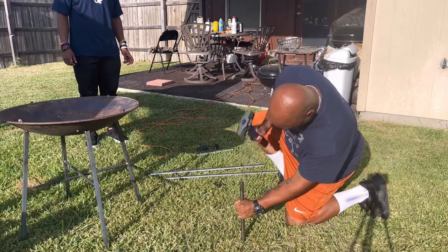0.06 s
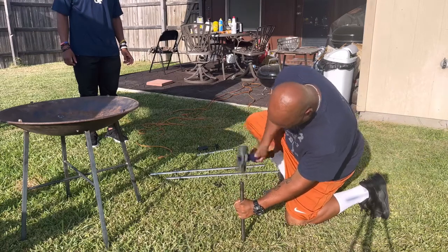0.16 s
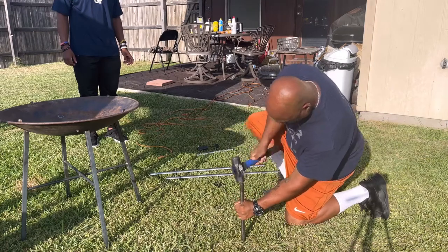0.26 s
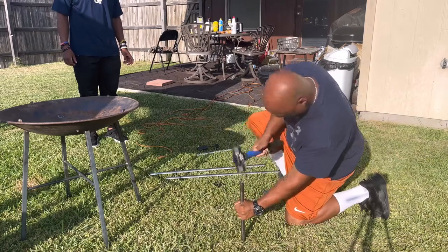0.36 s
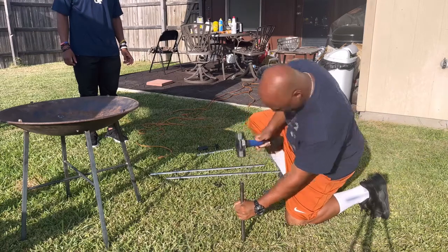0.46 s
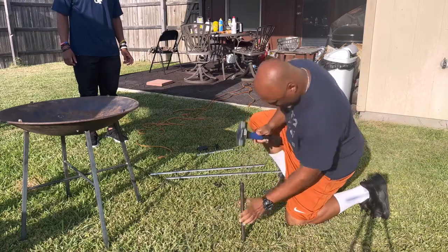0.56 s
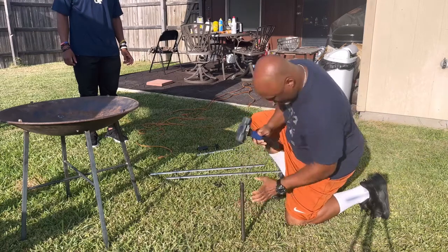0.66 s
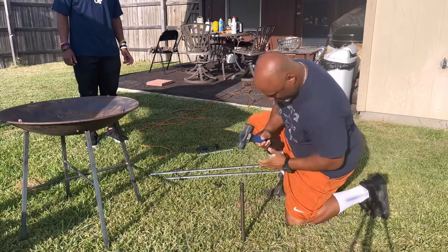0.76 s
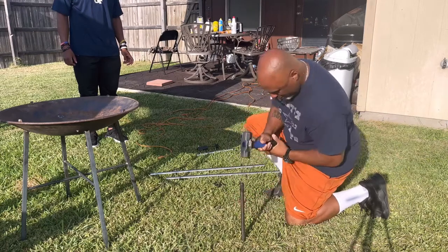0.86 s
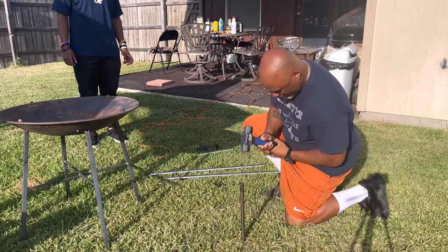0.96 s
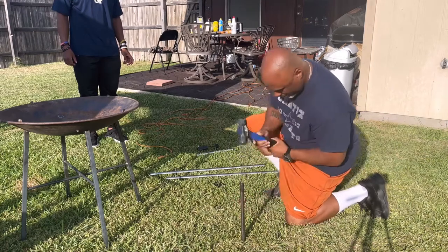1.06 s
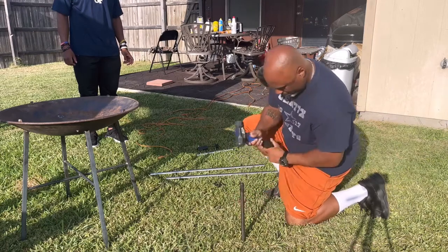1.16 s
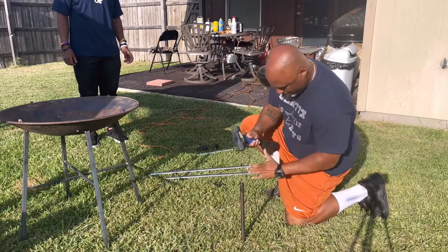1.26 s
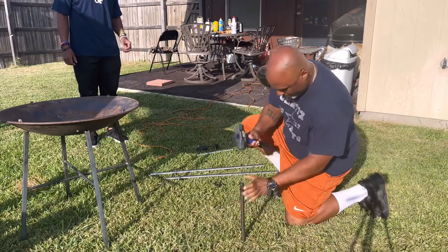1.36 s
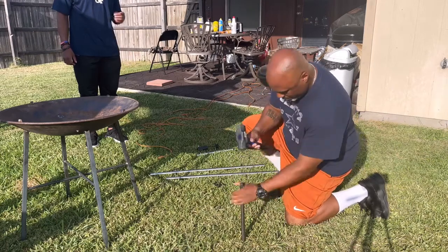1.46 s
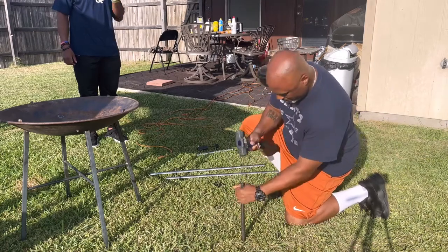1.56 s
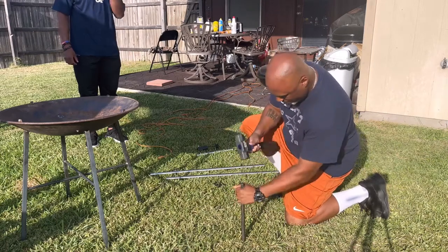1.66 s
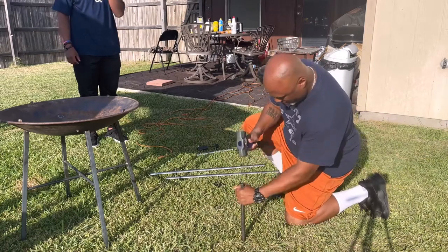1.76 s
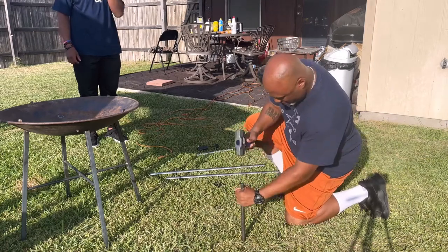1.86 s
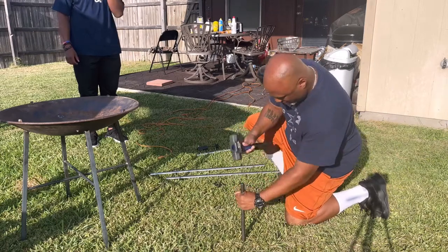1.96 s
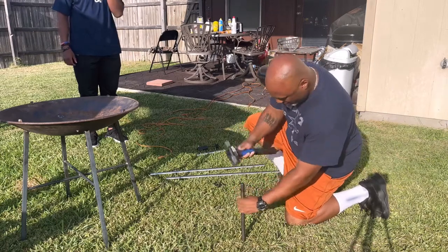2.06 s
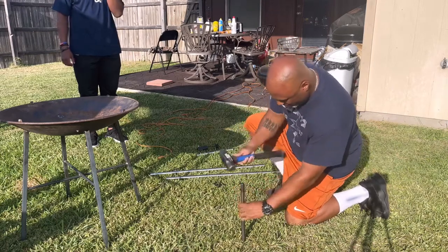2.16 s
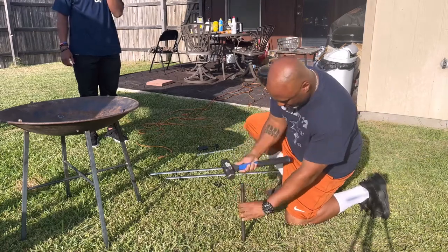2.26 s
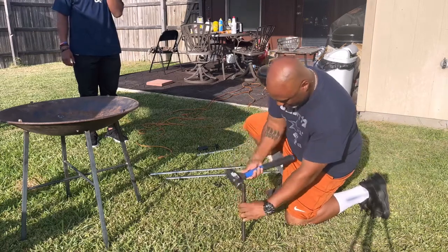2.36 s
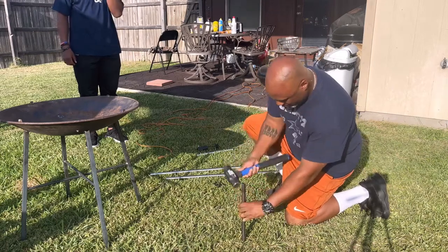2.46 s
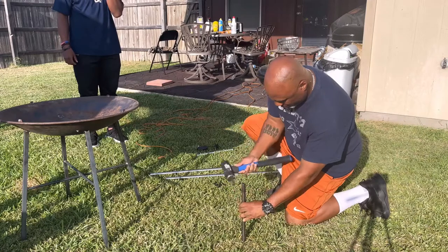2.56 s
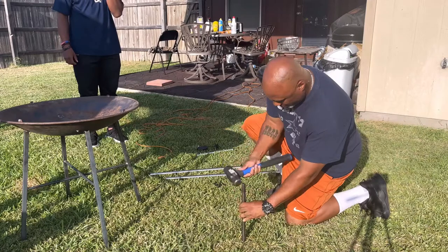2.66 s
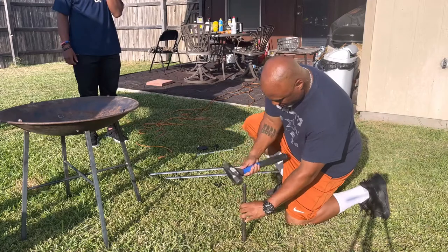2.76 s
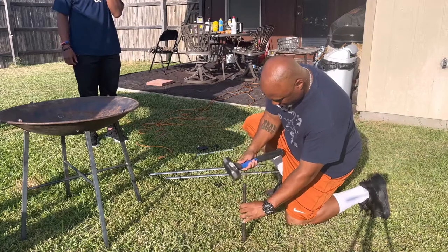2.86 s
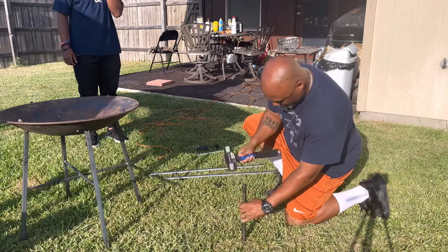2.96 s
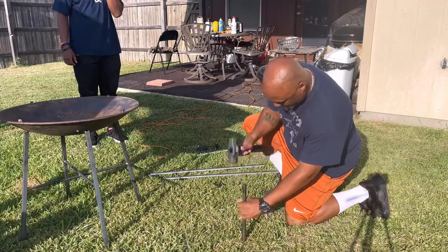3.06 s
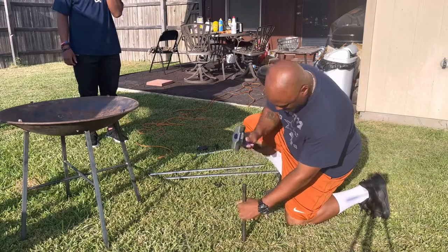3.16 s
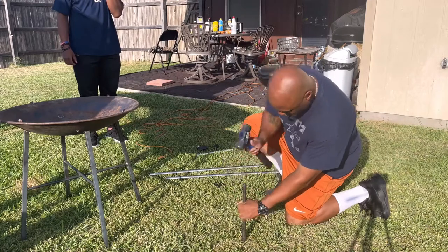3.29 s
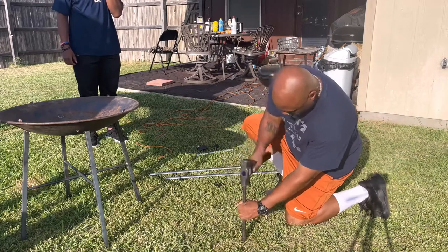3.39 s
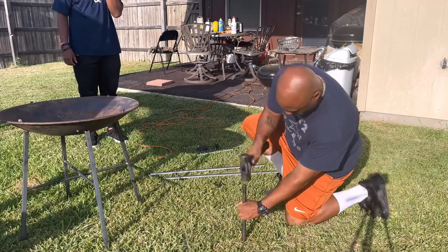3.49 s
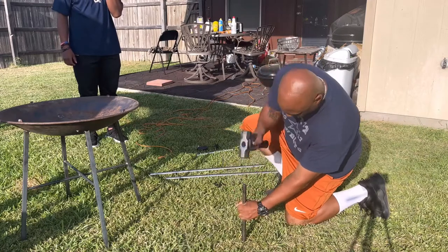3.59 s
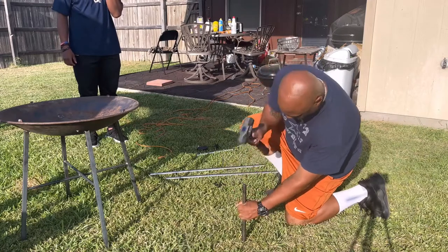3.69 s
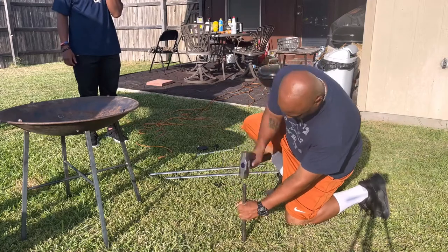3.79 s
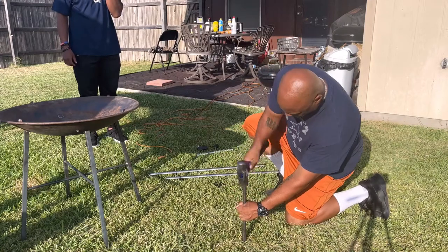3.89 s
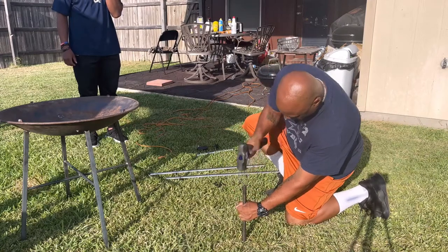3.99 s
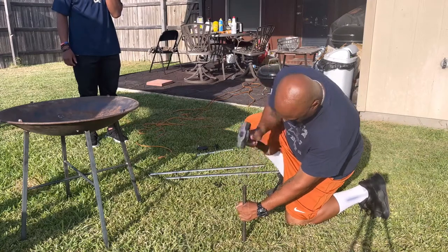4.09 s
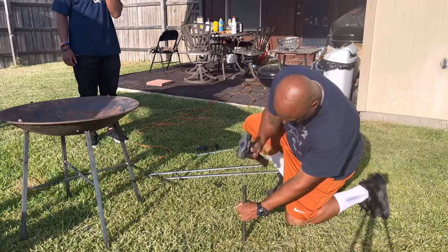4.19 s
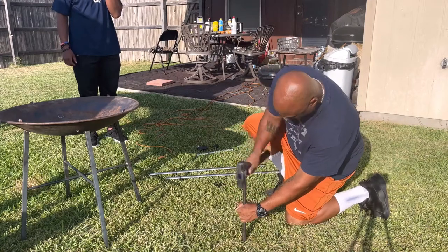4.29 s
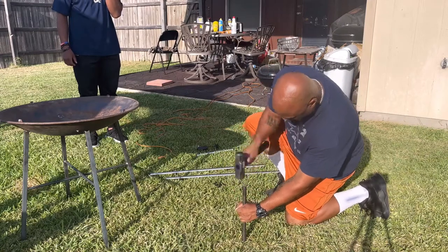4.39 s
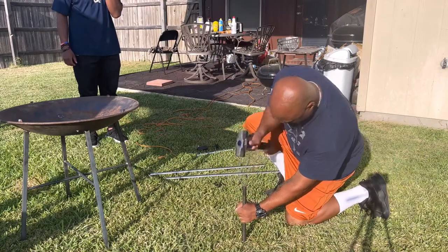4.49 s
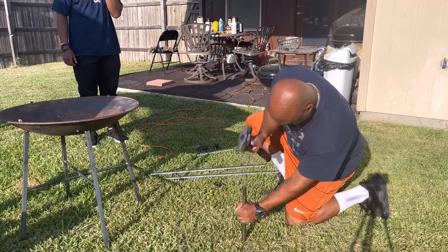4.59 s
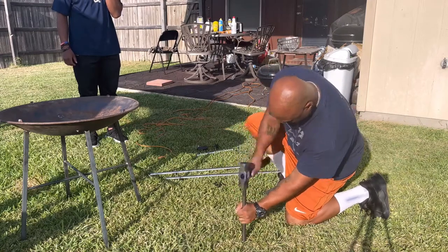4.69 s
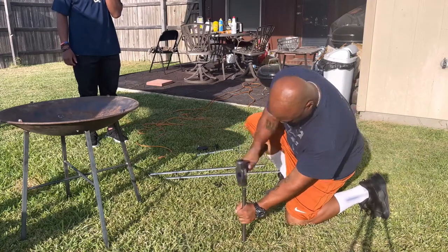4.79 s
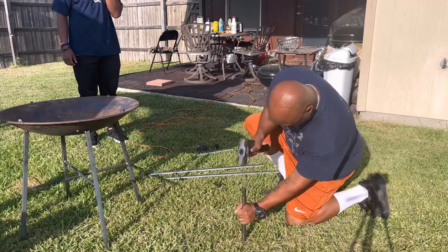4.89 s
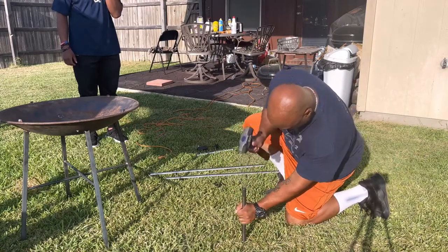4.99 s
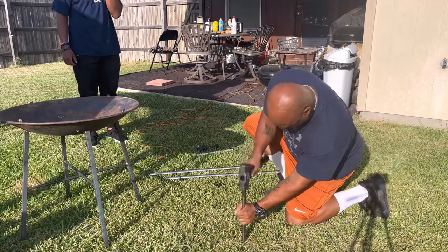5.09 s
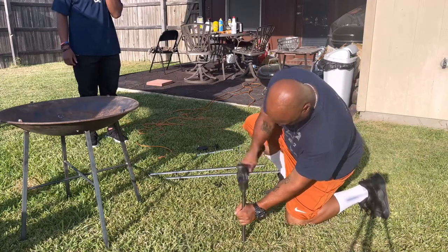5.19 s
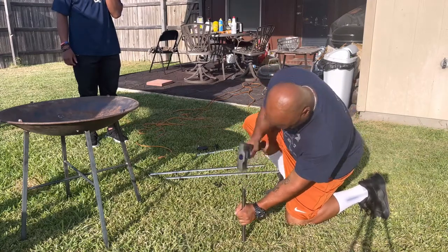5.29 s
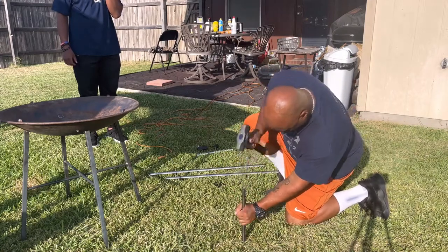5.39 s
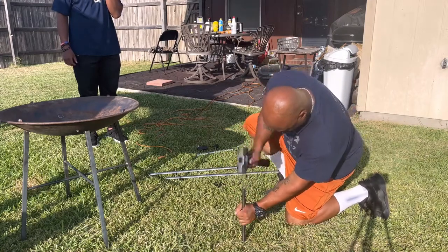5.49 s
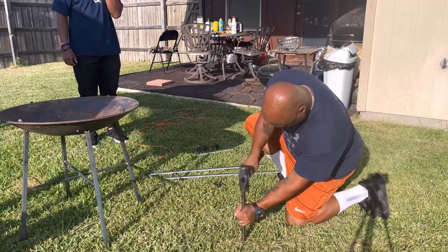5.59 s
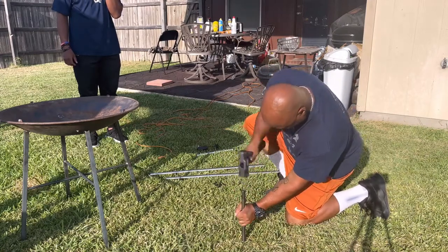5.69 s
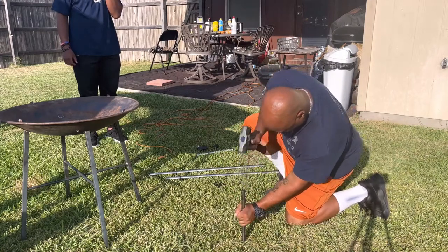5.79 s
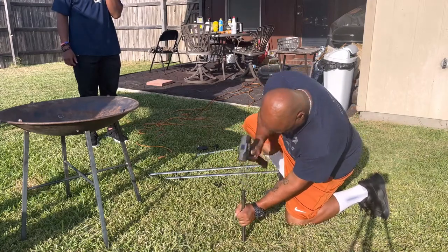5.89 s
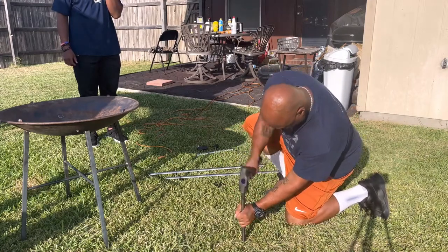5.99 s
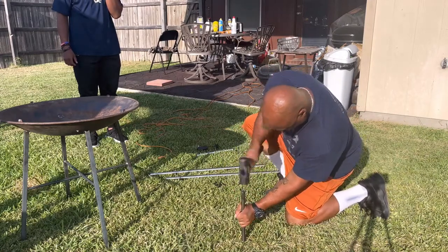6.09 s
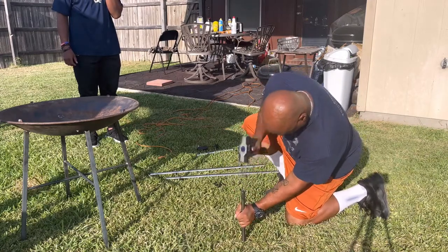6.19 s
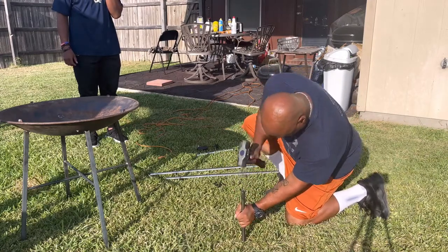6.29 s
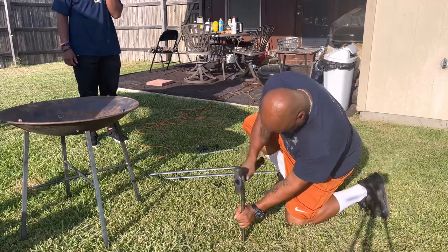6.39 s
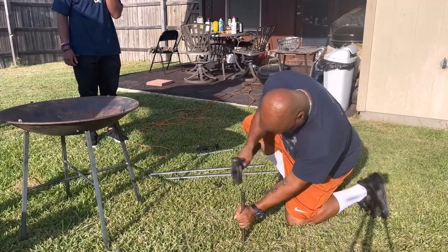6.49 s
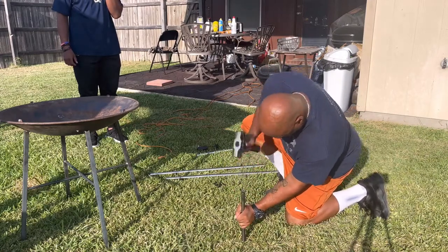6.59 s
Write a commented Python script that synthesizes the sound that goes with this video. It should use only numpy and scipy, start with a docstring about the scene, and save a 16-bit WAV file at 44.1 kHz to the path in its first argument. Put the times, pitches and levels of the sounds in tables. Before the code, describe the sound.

Short, damped metal clanks of a hammer on a ground stake, two light taps leading into eight full blows, over faint wind.

```python
"""A clank dies away and another lands: a steel stake, steadied in one fist, is being hammered into a lawn.
After a pause come two light setting taps, then eight full blows. Each is a short, damped clank of steel
with a thin ring, over a thud of soil; house walls and a fence throw it back. Behind it lie light wind on
the microphone, distant traffic and a faint hiss. Early on a far motor swells and fades, and soft bumps,
snapping grass, a far bird and a rustle of clothes dot the gaps."""
import sys
import numpy as np
from scipy import signal
from scipy.fft import rfft, irfft, next_fast_len
from scipy.io import wavfile
from scipy.ndimage import uniform_filter1d

SR = 44100
rng = np.random.default_rng(int(sys.argv[2]) if len(sys.argv) > 2 else 0)


def wav_record(signal):
    """Record a signal, one row per channel, as 16-bit PCM in the file named by sys.argv[1]."""
    frames = np.transpose(np.atleast_2d(signal))
    bounded = np.clip(frames, -1, 1)
    # unit amplitude maps onto the largest positive 16-bit level
    quanta = np.round(bounded * 32767).astype(np.int16)
    wavfile.write(sys.argv[1], SR, quanta)


N = 293265

# Hammer blows; where the head lands decides how much the shaft sings at 4.7 kHz (mid) and 9.6 kHz (top):
# start_s, force_db, mid_ring_db, top_ring_db
HAMMER_BLOWS = [ (-0.235, -7.5, 9, -7), (0.1952, -3.5, 0, -16.5), (2.3363, -16, -5, -3),
                (2.6894, -14, 1.5, -1), (3.3887, -1.5, 0.5, -23), (3.8247, -0.5, 2.5, 3),
                (4.2604, -1, 2, 7), (4.6908, 0, 3, -0.5), (5.109, 0.5, 3.5, 9.5), (5.5384, -0.5, 14, -3),
                (5.9614, -1, 5, -20.5), (6.3579, -1, 6.5, -0.5)]
# Damped modes of hammer head and gripped stake: pitch_hz, width_hz, level_db, pan_db (left minus right)
CLANK_MODES = [ (264, 110, 22, -1.5), (479, 61, 22, -2.5), (745, 160, 17.5, -4), (1015, 120, 23.5, -4.5),
               (1200, 190, 19.5, -3), (1586, 470, 17, -4.5), (2096, 190, 24, 1.5), (2430, 213, 19, -7.5),
               (2695, 250, 20.5, -1), (3121, 180, 25, 0.5), (3391, 280, 20, -1), (5300, 510, 10.5, -11.5),
               (6560, 150, 15, -12.5), (7100, 240, 8, -6.5), (7530, 500, -0.5, -4), (8470, 380, 11, -7),
               (10080, 400, 8, -2), (10830, 160, 17.5, 2.5), (12900, 400, -3, 2.5), (15400, 620, 8, -1.5)]
# Stake modes the fist hardly damps: pitch_hz, width_hz, level_db, pan_db, level_db_per_force_db
RING_MODES = [(4050, 170, -1.5, -5.5, -1.0), (4690, 180, 9, -4, 0.5), (5426, 90, 21.5, -8, 1.2),
              (9557, 80, 18.5, 0.5, -0.05)]
# Tone of steel cracking on steel: frequency_hz, gain_db
CRACK_EQ = [(120, -9), (600, -1), (1500, 0.5), (3300, 2.5), (4500, 0), (6000, -13.5), (7400, 3),
            (10900, 1.5), (12000, -10.5), (16000, -12)]
# Low modes of the soil giving way: pitch_hz, level_db, t60_s, delay_s
SOIL_MODES = [(188, -28, 0.068, .005), (141.6, -27, 0.098, .008), (88, -32.5, .11, 0.01)]
# Phase by which the left microphone port leads the right: frequency_hz, lead_rad
PORT_LEAD = [(150, -.12), (900, -.25), (1800, -.85), (3200, -1.6), (4700, .5), (6600, 0), (10000, 1.2),
             (13000, 1.9)]
# Slapback from walls, patio and fence: delay_s, level_db, smear_s
WALL_SLAPS = [(0.015, -9, 0.0009), (.0185, 0.5, .004), (.0425, -7.5, .005), (.049, -12, .005),
              (0.0847, -5.5, .0028), (.096, -16, 0.005), (.135, -14.5, 0.008)]
# Tone of the slaps against the diffuse tail: frequency_hz, gain_db
SLAP_EQ = [(1000, -5), (2500, -3.5), (4000, 2), (6500, 0), (9000, -11), (15000, -10.5)]
# Decay of the yard's diffuse tail: frequency_hz, t60_s
YARD_DECAY = [(150, 0.49), (1000, 0.51), (3000, 0.51), (5300, 0.59), (8000, 0.38), (11000, 0.41),
              (15000, 0.23)]
# Tone of all the reflections: frequency_hz, gain_db
YARD_EQ = [(100, -16.5), (300, -20), (600, -16), (1100, -13), (2200, -14.5), (3200, -16), (4000, -5.5),
           (5500, -7), (6000, -11.5), (8500, -10.5), (11000, -15), (12500, -28.5), (16000, -20)]
# Rightward lean of the reflections: frequency_hz, pan_db (left minus right)
YARD_BALANCE = [(200, -1), (1000, -2.5), (3000, -3.5), (4200, -8.5), (5300, -11.5), (6600, -5), (10000, 0)]
# Rise and fall of the wind on the microphone: time_s, relative_level_db
WIND_GUSTS = [(0.0, -60), (0.13, -54.5), (0.33, -49), (0.65, -55), (0.89, -56.5), (1.3, -48), (1.46, -55.5),
              (1.72, -70.5), (2.18, -71), (2.76, -56), (2.94, -65.5), (3.3, -77.5), (3.58, -60),
              (4.37, -57.5), (6.31, -53.5), (6.65, -57.5)]
# Tone of the wind's rumble: frequency_hz, gain_db
WIND_EQ = [(20, -21.5), (40, -10), (72, -1.5), (110, -12), (170, -19), (300, -26.5), (600, -67)]
# Tone of distant traffic: frequency_hz, gain_db
TRAFFIC_EQ = [(35, -21.5), (60, 0.5), (81, -10.5), (124, -10), (398, -11), (607, -10), (803, -13),
              (1310, -12.5), (2770, -37.5), (4320, -35.5), (5460, -45), (8510, -51), (9790, -41),
              (10800, -60.5), (16000, -69.5)]
# Narrow band of microphone hiss: frequency_hz, gain_db
HISS_EQ = [(8500, -34.5), (9500, -4.5), (10100, 0), (10700, -37.5)]
# How alike left and right are in the noise layers: frequency_hz, likeness (0 wide, 1 nearly mono)
STEREO_LIKENESS = [(60, 0.44), (180, 1), (550, -0.057), (1650, -0.16), (4970, 0.47), (15000, 0.38)]
# First three harmonics of the motor at the top of its swell: level_db
MOTOR_HARMONICS = [-69, -58, -67]
# Soft low bumps: centre_s, level_db, half_width_s
LOW_BUMPS = [(0.41, -37, 0.021), (0.441, -30.5, 0.0051), (1.132, -38.5, 0.018), (1.257, -28.5, 0.004),
             (1.423, -35, 0.012), (2.794, -32, 0.0044), (5.086, -34.5, 0.012)]
# Grass blades snapping: start_s, level_db
GRASS_SNAPS = [(.575, -63), (.69, -59), (1.0, -64)]
# Chirps of a far bird: start_s, start_pitch_hz, level_db
BIRD_CHIRPS = [(0.88, 4700, -65), (1.275, 4300, -76), (1.385, 4870, -67), (1.765, 4500, -68),
               (1.93, 4450, -75.5), (3.241, 4250, -77.5)]
# Clothing brushing as the arm moves: centre_s, level_db
CLOTH_SWISHES = [(1.13, -75.5), (1.91, -81)]
# Tone of the cloth: frequency_hz, gain_db
CLOTH_EQ = [(2000, -12), (6500, 0), (11000, 3), (13000, -10), (15000, -3), (17000, -14)]

# A harder blow stays longer on the stake and sounds fuller and duller.
# Each pair is the value at 0 dB of force and its change per dB of force.
CONTACT_S, CONTACT_DB_PER_DB = .019, .5
BODY_DB, BODY_DB_PER_DB = -1.5, 0.87   # clank below 900 Hz
TREBLE_DB, TREBLE_DB_PER_DB = -4, -0.66   # 4.8 to 7 kHz
WALL_TREBLE_DB, WALL_TREBLE_DB_PER_DB = 0.57, -0.01   # treble thrown sideways to the walls

LOOSE_BODY_DB, PACKING_S = 9, 2.1   # the loose stake sounds hollow until the soil packs round it
REBOUND_S, REBOUND_SPREAD_S, REBOUND_DB = .0042, .0003, -6
FAR_SIDE_S, FAR_DB_PER_DB = 0.11, -0.23   # the far side of the yard stands out more after a light tap


def from_db(db):
    """Decibels to gain."""
    return 10 ** (np.asarray(db) / 20)


def rms_one(x):
    """Scale to unit rms."""
    return x / np.sqrt(np.mean(x ** 2) + 1e-20)


def at_hz(points, hz):
    """Read a table on a log-frequency axis."""
    frequencies, values = np.transpose(points)
    return np.interp(np.log(np.maximum(hz, 1)), np.log(frequencies), values)


def panned(db):
    """Left and right gains for a left-minus-right level difference."""
    return from_db(np.array([[.5], [-.5]]) * db)


def eq(x, curve):
    """Minimum-phase equaliser that follows a curve of frequency_hz, gain_db."""
    n = x.shape[-1]
    size = 2 * next_fast_len(n)
    gain = from_db(at_hz(curve, np.fft.rfftfreq(size, 1 / SR)))
    cepstrum = irfft(np.log(gain))
    cepstrum[1:size // 2] *= 2
    cepstrum[size // 2 + 1:] = 0
    return irfft(rfft(x, size) * np.exp(rfft(cepstrum)))[..., :n]


def add(out, sound, start_s):
    """Mix a sound in at a time, trimmed to fit."""
    at = round(start_s * SR)
    first, last = max(at, 0), min(at + sound.shape[-1], out.shape[-1])
    if last > first:
        out[..., first:last] += sound[..., first - at:last - at]


def burst(decay_s, passes=5):
    """Dying noise, about equally strong at all pitches: chattering steel faces, or a scattered echo."""
    t = np.arange(4096) / SR
    x = rng.standard_normal(len(t)) * from_db(-60 * t / decay_s)
    for _ in range(passes):
        spectrum = rfft(x)
        flattened = irfft(spectrum / (np.abs(spectrum) + 1e-12))
        x = flattened * np.exp(-(t / decay_s) ** 2)
    return np.pad(x, (0, len(t)))


def steel_modes(push, modes, scatter_db=0.89, detune=0.013):
    """Struck steel: parallel resonances of alternating sign, a little different on every hit."""
    out = np.zeros((2, len(push)))
    for k, (hz, width_hz, db, pan_db) in enumerate(modes):
        level_jitter, pitch_jitter = rng.standard_normal(2)
        radius = np.exp(-np.pi * width_hz / SR)
        angle = 2 * np.pi * hz * (1 + detune * pitch_jitter) / SR
        poles = [1, -2 * radius * np.cos(angle), radius ** 2]
        mode = signal.lfilter([1, 0, -1], poles, push + 1e-18) * (1 - radius ** 2) / 2
        out += (-1) ** k * from_db(db + scatter_db * level_jitter) * panned(pan_db) * mode
    return out


def crack(contact_s, pan_db=-3):
    """The bite of the hit: dense, quickly damped vibration between the modes, different on each side."""
    chatter = np.array([burst(contact_s), burst(contact_s)])
    return panned(pan_db) * eq(chatter, CRACK_EQ)


def shaft_ring(contact_s, force_db, mid_ring_db, top_ring_db):
    """The thin ring that escapes the fist, set by how hard and where the head lands."""
    extras_db = (0, mid_ring_db, 0, top_ring_db)
    modes = [(hz, width_hz, db + per_db * force_db + extra_db, pan_db)
             for (hz, width_hz, db, pan_db, per_db), extra_db in zip(RING_MODES, extras_db)]
    return steel_modes(burst(contact_s), modes, detune=0.0019)


def late_bass(x, centre_hz=270, lag_s=0.0038):
    """Low bending waves travel slowly: an all-pass holds back the bass around one pitch."""
    radius, angle = np.exp(-2 / (lag_s * SR)), 2 * np.pi * centre_hz / SR
    poles = [1, -2 * radius * np.cos(angle), radius ** 2]
    return signal.lfilter(poles[::-1], poles, x)


def struck_stake(start_s, force_db, mid_ring_db, top_ring_db):
    """Clank, crack and ring, then a softer clank as the stake kicks back against the hammer."""
    contact_s = CONTACT_S * from_db(CONTACT_DB_PER_DB * force_db)
    clank = steel_modes(burst(contact_s), CLANK_MODES)
    steel = clank + crack(contact_s) + shaft_ring(contact_s, force_db, mid_ring_db, top_ring_db)
    rebound = from_db(REBOUND_DB) * steel_modes(burst(contact_s), CLANK_MODES)
    add(steel, rebound, REBOUND_S + REBOUND_SPREAD_S * rng.standard_normal())
    hollow_db = LOOSE_BODY_DB * np.exp(-max(start_s, 0) / PACKING_S)
    body_db = BODY_DB + BODY_DB_PER_DB * force_db + hollow_db
    treble_db = TREBLE_DB + TREBLE_DB_PER_DB * force_db
    tone = [(900, body_db), (1600, 0), (3300, 0), (4800, treble_db), (7000, treble_db), (13000, 0)]
    return from_db(force_db) * late_bass(eq(steel, tone))


def soil_thud(samples, force_db, rise_s=0.0011, db_per_force_db=0.4):
    """The weight under the clank: the soil takes the push in low modes that swell quickly and die."""
    thud = np.zeros(samples)
    for hz, db, t60_s, delay_s in SOIL_MODES:
        t = np.maximum(np.arange(samples) / SR - delay_s, 0)
        envelope = (1 - np.exp(-t / rise_s)) * from_db(db - 60 * t / t60_s)
        thud += envelope * np.sin(2 * np.pi * hz * t)
    return from_db(db_per_force_db * force_db) * thud * panned(-1.5)


def at_ports(x):
    """Sound from the stake reaches the two microphone ports out of step."""
    size = next_fast_len(x.shape[1])
    lead_rad = at_hz(PORT_LEAD, np.fft.rfftfreq(size, 1 / SR))
    phase_shift = np.exp(1j * lead_rad * np.array([[.5], [-.5]]))
    return irfft(rfft(x, size) * phase_shift, size)[:, :x.shape[1]]


def yard(x, far_db, tail_db=-1.0, build_s=.004, scatter_db=1.55):
    """Smeared slaps off walls and fence over a diffuse tail whose top dies first; far_db lifts the end."""
    t = np.arange(SR * 3 // 4) / SR
    hz = np.fft.rfftfreq(len(t), 1 / SR)
    white = rfft(rng.standard_normal((2, len(t))))
    tail, slaps = np.zeros((2, 2, len(t)))
    for centre_hz, t60_s in YARD_DECAY:
        band = at_hz([(f, f == centre_hz) for f, _ in YARD_DECAY], hz)
        tail += irfft(white * band, len(t)) * from_db(-60 * t / t60_s)
    tail *= 1 - np.exp(-(t / build_s) ** 2)
    tail *= from_db(tail_db) / np.sqrt(np.sum(tail ** 2) / 2)
    for delay_s, db, smear_s in WALL_SLAPS:
        gain = from_db(db + scatter_db * rng.standard_normal())
        slap = np.array([burst(smear_s * np.log(1000)) for side in range(2)])
        add(slaps, gain * slap, delay_s)
    far_lift = from_db(np.interp(t, [FAR_SIDE_S / 2, FAR_SIDE_S], [0, far_db]))
    centred = eq(far_lift * (tail + eq(slaps, SLAP_EQ)), YARD_EQ)
    response = np.array([eq(side, [(f, share * db) for f, db in YARD_BALANCE])
                         for side, share in zip(centred, (.5, -.5))])
    return signal.fftconvolve(x.mean(axis=0)[None], response, axes=1)


def hammering():
    """Every blow, heard directly and off the walls; the moving body scatters each one differently."""
    direct, reflected = np.zeros((2, 2, N))
    for start_s, force_db, mid_ring_db, top_ring_db in HAMMER_BLOWS:
        steel = struck_stake(start_s, force_db, mid_ring_db, top_ring_db)
        blow = steel + soil_thud(steel.shape[1], force_db)
        wall_db = WALL_TREBLE_DB + WALL_TREBLE_DB_PER_DB * force_db
        outward = eq(blow, [(3200, 0), (4000, wall_db), (7000, wall_db), (11000, 0)])
        add(direct, blow, start_s)
        add(reflected, yard(outward, FAR_DB_PER_DB * force_db), start_s)
    return at_ports(direct) + reflected


def stereo_noise(curve):
    """Steady noise at unit rms, shaped by an EQ curve; its stereo width varies with frequency."""
    hz = np.fft.rfftfreq(N, 1 / SR)
    mid, side = rfft(rng.standard_normal((2, N)))
    likeness = np.clip(at_hz(STEREO_LIKENESS, hz), 0, .98)
    left_right = np.sqrt(1 + likeness) * mid + np.sqrt(1 - likeness) * side * [[1], [-1]]
    return rms_one(irfft(left_right * from_db(at_hz(curve, hz)), N))


def wind(trim_db=3):
    """Light gusts rumble on the microphone."""
    gust_db = np.interp(np.arange(N) / SR, *np.transpose(WIND_GUSTS))
    return from_db(gust_db + trim_db) * stereo_noise(WIND_EQ)


def traffic(level_db=-59):
    """Distant traffic blurs into a steady, dark wash."""
    return from_db(level_db) * stereo_noise(TRAFFIC_EQ)


def microphone_hiss(level_db=-86.5):
    """The microphone's own thin hiss, near 10 kHz."""
    return from_db(level_db) * stereo_noise(HISS_EQ)


def motor_hum(pitch_hz=151.3, peak_s=.78, rise_db_per_s=18.5, fall_db_per_s=25):
    """A distant motor swells and fades on one pitch."""
    t = np.arange(N) / SR - peak_s
    swell = from_db(np.minimum(rise_db_per_s * t, -fall_db_per_s * t))
    tone = sum(from_db(db) * np.sin(2 * np.pi * k * pitch_hz * t)
               for k, db in enumerate(MOTOR_HARMONICS, start=1))
    return swell * tone


def bumps(usual_hz=87, usual_half_width_s=0.0098, port_spread_rad=0.48):
    """Dull puffs of a few cycles at most, a little out of step at the two microphone ports."""
    out, t = np.zeros((2, N)), np.arange(N) / SR
    for centre_s, db, half_width_s in LOW_BUMPS:
        hz = usual_hz * (usual_half_width_s / half_width_s) ** 0.33   # shorter puffs are higher
        phase = rng.uniform(0, 2 * np.pi) + port_spread_rad * rng.standard_normal((2, 1))
        envelope = from_db(db) * np.exp(-((t - centre_s) / half_width_s) ** 2)
        out += envelope * np.sin(2 * np.pi * hz * (t - centre_s) + phase)
    return out


def grass(t60_s=0.033):
    """Blades snap under the knee in tiny dry ticks."""
    out, t = np.zeros((2, N)), np.arange(SR // 10) / SR
    for start_s, db in GRASS_SNAPS:
        snap = rng.standard_normal((2, len(t))) * from_db(db - 60 * t / t60_s)
        add(out, eq(snap, [(1500, -6), (5000, -1), (8000, -4), (15000, -13)]), start_s)
    return out


def bird(chirp_s=.125, fall_hz_per_s=9500, rasp_hz=300):
    """A far bird's harsh chirps, all falling at one rate, washed in the yard's reflections."""
    chirps, t = np.zeros((2, N)), np.arange(int(chirp_s * SR)) / SR
    for start_s, start_hz, db in BIRD_CHIRPS:
        rasp = rms_one(uniform_filter1d(rng.standard_normal(SR // 2), size=40))[:len(t)]
        pitch_hz = start_hz - fall_hz_per_s * t + rasp_hz * rasp
        envelope = from_db(db) * np.sin(np.pi * t / chirp_s)
        add(chirps, envelope * np.sin(2 * np.pi * np.cumsum(pitch_hz) / SR), start_s)
    return 0.91 * chirps + 1.25 * yard(chirps, far_db=0.5)[:, :N]


def cloth_rustle(half_width_s=0.066):
    """Clothing brushes in brief, faint swishes as the arm moves."""
    t = np.arange(N) / SR
    envelope = sum(from_db(db) * np.exp(-((t - centre_s) / half_width_s) ** 2)
                   for centre_s, db in CLOTH_SWISHES)
    return envelope * stereo_noise(CLOTH_EQ)


def scene():
    """Hammering up front, over the quiet bed of a suburb."""
    bed = wind() + traffic() + microphone_hiss() + motor_hum()
    return hammering() + bed + bumps() + grass() + bird() + cloth_rustle()


def record(dry, low_cut_hz=32, ceiling=1.2, high_cut_hz=16300):
    """Roll off the deepest bass, round the loudest peaks and cut the very top."""
    low_cut = signal.butter(2, low_cut_hz, "high", fs=SR, output="sos")
    high_cut = signal.ellip(10, .1, 110, high_cut_hz, fs=SR, output="sos")
    thinned = signal.sosfilt(low_cut, dry)
    rounded = ceiling * np.tanh(thinned / ceiling)
    return signal.sosfilt(high_cut, rounded)


dry = scene()
out = record(dry)
wav_record(out)
```